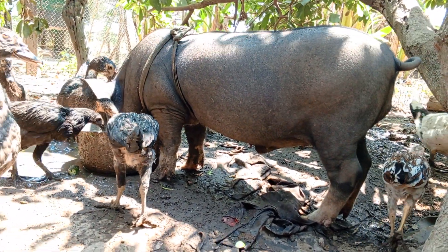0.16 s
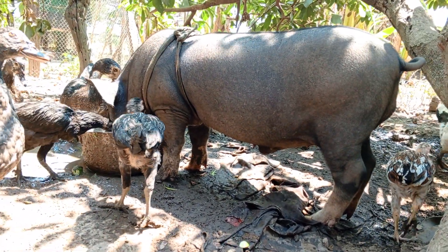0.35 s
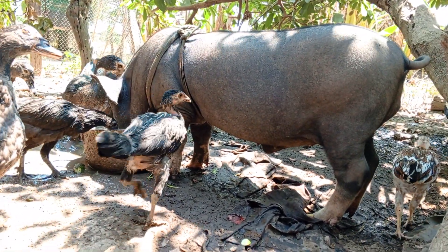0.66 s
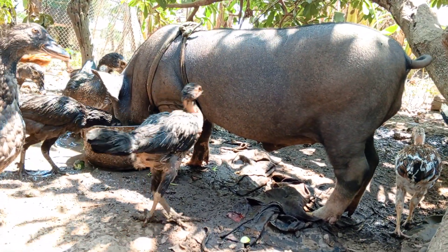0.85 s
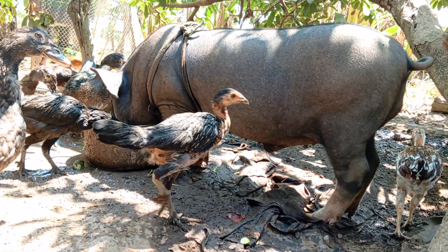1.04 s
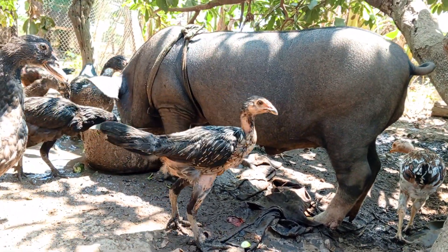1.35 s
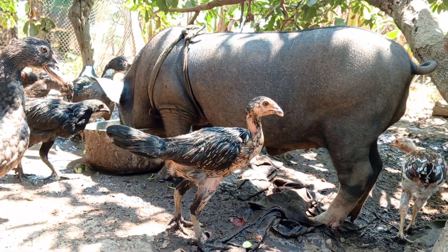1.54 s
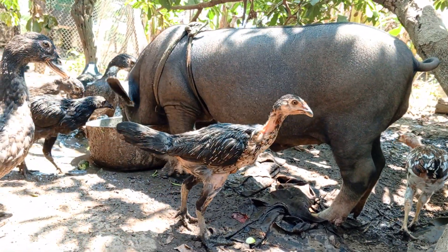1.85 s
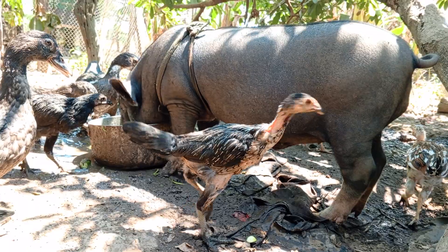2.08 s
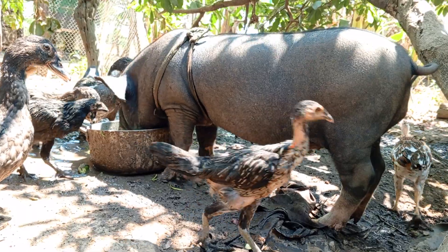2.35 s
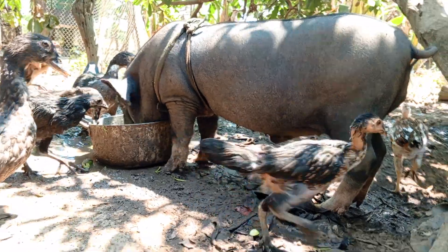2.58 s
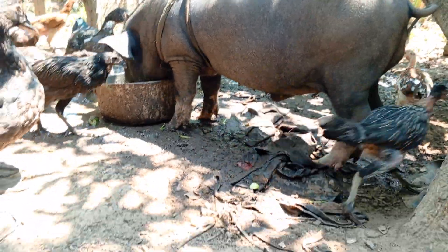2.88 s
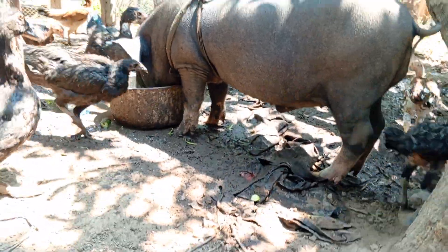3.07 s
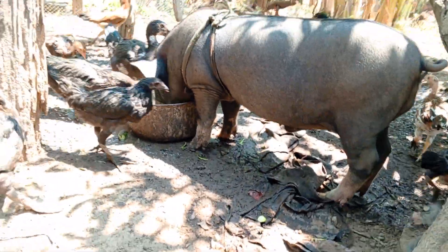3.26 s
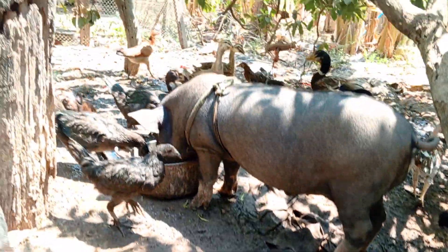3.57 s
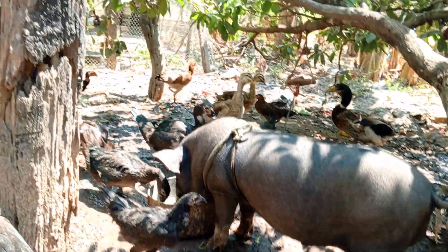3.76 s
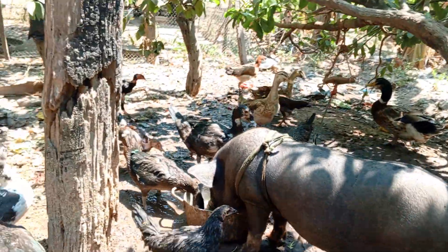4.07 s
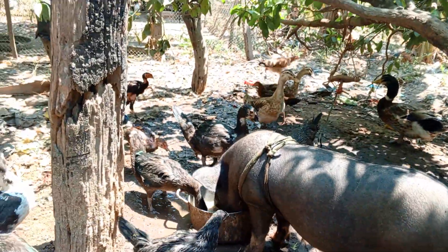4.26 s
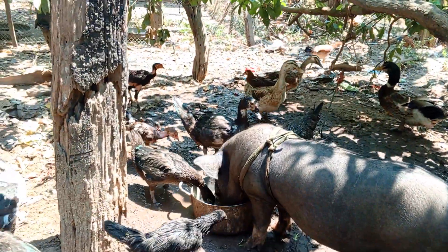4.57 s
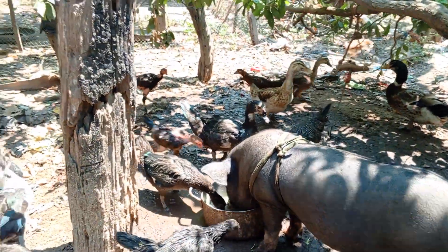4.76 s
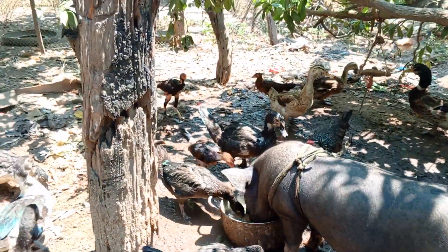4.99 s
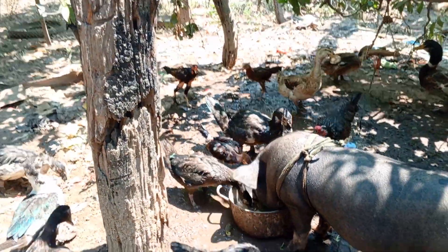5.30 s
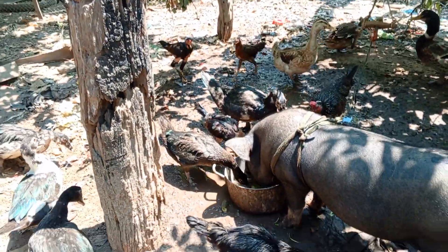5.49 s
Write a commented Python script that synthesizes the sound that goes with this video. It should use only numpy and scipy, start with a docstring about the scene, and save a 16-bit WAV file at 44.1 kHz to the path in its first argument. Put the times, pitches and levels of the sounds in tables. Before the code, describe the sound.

Close microphone among feeding poultry in an open yard with short scattered echoes. One long rasping quack comes early, then a light metallic bowl tick and a deep buffeting gust. Small clucks, high falling cheeps and dry beak knocks continue; two more quacks arrive late, the last shorter and mixed with a honk, before a flurry of pecking.

```python
"""Wind buffets the microphone and dies down, over a faint low hum and a patchy background bustle.
A close duck quacks three times: partials of a membrane, shaken by a second, plus air puffs through a moving bill.
Hens cluck (noise rings a narrow throat), chicks cheep and peep (near sines); a honk rises with the third quack.
Beaks peck (noise splashes), knock on a trough (a push of its wall) and tick a metal bowl (decaying modes).
Scattered echoes of the yard follow the birds and beaks; thin air hiss lies behind."""
import sys
import numpy as np
from scipy import signal
from scipy.fft import rfft, irfft
from scipy.io import wavfile
from scipy.ndimage import uniform_filter1d

SR = 44100
rng = np.random.default_rng(int(sys.argv[2]) if len(sys.argv) > 2 else 0)


def transcribe(signal):
    """Save signal, clipped to [-1, 1], as a 16-bit WAV file at the path in sys.argv[1]."""
    frames = np.atleast_2d(signal).T
    limited = np.clip(frames, -1, 1)
    pcm = np.round(limited * 32767).astype(np.int16)
    wavfile.write(sys.argv[1], SR, pcm)


N = 248283  # samples


def gain_of(db):
    """Logarithmic level: converts decibels to an amplitude factor."""
    return 10 ** (np.asarray(db) / 20)


def evened(x):
    """Energy normalisation: scales a signal to rms 1."""
    return x / np.sqrt(np.mean(x ** 2) + 1e-20)


def colour(x, points):
    """Spectral shaping: weights x by (hz, db) points joined on a log-frequency axis; rms 1."""
    point_hz, point_db = np.transpose(points)
    hz = np.fft.rfftfreq(len(x), 1 / SR)
    weight_db = np.interp(np.log(hz + 1), np.log(point_hz), point_db, left=-99)
    return evened(irfft(rfft(x) * gain_of(weight_db), len(x)))


def noise_of(size):
    """White noise: equal power at all frequencies."""
    return rng.standard_normal(size)


def add(mix, s, sound):
    """Superposition: sums a sound into the mix from s seconds on."""
    part = mix[max(round(s * SR), 0):][:len(sound)]
    part += sound[:len(part)]


def columns(rows, t):
    """Linear interpolation: reads each column of a curve table at times t."""
    s, *rest = np.transpose(rows)
    return [np.interp(t, s, c) for c in rest]


def drift(size, hz):
    """Random modulation: low-passed noise of rms 1, varying up to about hz."""
    smooth = signal.lfilter(*signal.butter(2, hz, fs=SR), noise_of(size + 2000))
    return evened(smooth[2000:])  # without the start of the filter's response


def ring(x, hz, width_hz):
    """Resonance: a fixed band-pass peak of given centre and bandwidth."""
    return signal.lfilter(*signal.iirpeak(hz, hz / width_hz, SR), x)


def resonate(x, hz, width_hz):
    """Moving resonance by heterodyning: shift the curve hz down to zero, smooth, shift back."""
    turn = np.exp(2j * np.pi * np.cumsum(hz) / SR)
    r = np.exp(-np.pi * width_hz / SR)
    return 2 * (turn * signal.lfilter([1 - r], [1, -r], x / turn)).real


def whistle(rows, waver):
    """Frequency modulation: a near sine along (start_s, pitch_hz, level_db), wavering in both."""
    t = np.arange(rows[0][0], rows[-1][0], 1 / SR)
    hz, db = columns(rows, t)
    turns = np.cumsum(hz * (1 + waver * drift(len(t), 170))) / SR
    flutter_db = 2.5 * drift(len(t), 60)
    return gain_of(db + flutter_db) * np.sin(2 * np.pi * turns) * signal.windows.tukey(len(t), .15)


def glide(s, length, start_hz, end_hz, db, waver):
    """Linear frequency sweep: one straight gliding note that swells and fades."""
    ends_db = -4  # level at start and end, relative to the middle
    rows = [(s + at * length, start_hz + at * (end_hz - start_hz), db + ends_db * (2 * at - 1) ** 2)
            for at in np.linspace(0, 1, 7)]
    return whistle(rows, waver)


def yard(x, t60, dull_hz):
    """Reverberation: scattered echoes from trunks, sheds and ground, decaying 60 dB in t60 seconds."""
    t = np.arange(0, .6, 1 / SR)
    tail = noise_of(len(t)) * gain_of(-60 * t / t60) * (t > .008)
    tail = signal.lfilter(*signal.butter(1, [700, dull_hz], "band", fs=SR), tail)
    return signal.fftconvolve(x, tail / np.linalg.norm(tail))[:N]


# strength of the low rumble before its lumps: start_s [s], level_db [dB]
RUMBLE_DB = [(0, -42.5), (.5, -46), (1.08, -39.5), (1.21, -36), (1.55, -41), (1.72, -37.5), (1.99, -45),
             (2.3, -42.5), (2.51, -47.5), (2.82, -66), (3.84, -67.5), (4.91, -56.5), (5.63, -70)]
# spectra of the rumble and of the roar: frequency_hz [Hz], density_db [dB per Hz]
RUMBLE_SPECTRUM = [(15, -51.5), (25, -22.5), (78, 4), (135, 4), (194, -6), (260, -18.5), (340, -35.5),
                   (570, -120)]
ROAR_SPECTRUM = [(100, -30.5), (170, 6), (199, 6.5), (562, -30.5), (618, -29), (700, -55.5), (910, -63.5),
                 (1540, -120)]
# eddies that thump the microphone: start_s [s], nominal level_db [dB], centre_hz [Hz]
EDDIES = [(0.059, -35, 134), (0.292, -29, 82), (0.513, -38.5, 111), (0.588, -31.5, 176), (1.143, -16, 71.5),
          (1.15, -8, 132), (1.21, -13.5, 169.4), (1.307, -19.5, 163), (1.361, -18.5, 151),
          (1.442, -21.5, 105), (1.682, -10.5, 196.2), (1.82, -19, 177), (1.889, -19, 192),
          (2.091, -38.5, 118.5), (2.393, -31.5, 140), (2.514, -35, 102.6), (2.601, -33, 110),
          (2.685, -39.5, 96.9), (3.101, -41.5, 72), (3.686, -39, 101.5)]
# roar level when the rumble is at gale level (dB); dB of roar per dB of rumble
ROAR_DB, GALE_DB, ROAR_GROWTH = -50, -39.5, 4.35


def wind():
    """Turbulence: lumpy rumble, a roar growing faster than it, and separate eddies a few cycles long."""
    rumble_db = columns(RUMBLE_DB, np.arange(N) / SR)[0]
    lumps = drift(N, 8.)
    out = gain_of(rumble_db + 3.3 * lumps) * colour(noise_of(N), RUMBLE_SPECTRUM)
    roar_db = ROAR_DB + ROAR_GROWTH * (rumble_db - GALE_DB) + 4 * lumps
    out += gain_of(roar_db) * colour(noise_of(N), ROAR_SPECTRUM)
    t = np.arange(0, .09, 1 / SR)
    envelope = (t / 0.038) * np.exp(-(t / 0.03) ** 2.01)
    for s, db, hz in EDDIES:
        eddy = np.sin(2 * np.pi * (hz * t + rng.random()))
        eddy += 0.55 * colour(noise_of(len(t)), ROAR_SPECTRUM)
        add(out, s - .008, gain_of(db - 4) * eddy * envelope)
    return signal.lfilter(*signal.butter(2, 65, "high", fs=SR), out)


# steady low tones: pitch_hz [Hz], level_db [dB, before a common lift]
HUM_TONES = [(86.1, -63), (123.8, -61), (209.9, -79.5)]


def hum():
    """Narrow-band tones: low sines whose level and phase waver at random."""
    t = np.arange(N) / SR
    out = np.zeros(N)
    for hz, db in HUM_TONES:
        level_db = db + 4 + 1.1 * drift(N, 14)
        out += gain_of(level_db) * np.sin(2 * np.pi * hz * t + 0.64 * drift(N, 31))
    return out


# level of the background bustle, with the tails of the quacks: start_s [s], level_db [dB]
BUSTLE_LEVEL = [(0, -61), (.2, -77.5), (.42, -65.5), (1, -53), (1.3, -66), (1.9, -59.5), (2.1, -77),
                (2.45, -66), (2.65, -75.5), (2.9, -67.5), (3.1, -80.5), (3.3, -72), (3.75, -73),
                (3.95, -86.5), (4.62, -48.5), (4.78, -67.5), (5.13, -50.5), (5.28, -64)]
# spectrum of the bustle: frequency_hz [Hz], density_db [dB per Hz]
BUSTLE_SPECTRUM = [(260, -31.5), (450, -17.5), (802, -13.5), (1100, -10), (1910, -3.5), (2080, -6),
                   (2260, -2), (4880, -11), (8000, -25.5), (10400, -52.5), (17600, -120)]


def bustle(patchy_db=5., flicker_db=2.5, calls_db=-9.):
    """Incoherent summation: patchy, flickering background noise; far birds add short blurred calls."""
    _, frame_s, z = signal.stft(noise_of(N), SR, nperseg=512)
    across_pitch = uniform_filter1d(noise_of(z.shape), 5, 0)
    unevenness = evened(uniform_filter1d(across_pitch, 16, 1))
    flicker = evened(uniform_filter1d(noise_of(len(frame_s)), 4))
    uneven_spectrum = z * gain_of(patchy_db * unevenness + flicker_db * flicker)
    patches = signal.istft(uneven_spectrum, SR, nperseg=512)[1][:N]
    calls = np.zeros(N)
    for at, long, high, bend in rng.random((170, 4)):
        start_hz, length = 1300 * 3 ** high, 0.018 + .06 * long
        end_hz = start_hz * (.85 + .2 * bend)
        add(calls, at * N / SR, whistle([(0, start_hz, 0), (length, end_hz, -4)], waver=.03))
    blurred = calls + yard(calls, 0.068, 10000)
    mixed = colour(evened(patches) + gain_of(calls_db) * evened(blurred), BUSTLE_SPECTRUM)
    return gain_of(columns(BUSTLE_LEVEL, np.arange(N) / SR)[0]) * mixed


# spectra of the steady hiss and of the thin top hiss: frequency_hz [Hz], density_db [dB per Hz]
AIR_SPECTRUM = [(3820, -29.5), (6500, -1.5), (8690, -19.5), (13400, -10.5), (15100, -11.5), (15800, -10.5)]
TOP_SPECTRUM = [(9000, -9.5), (13000, -6.5), (14500, 0.5), (15800, -0.5)]
# level of the top hiss before its flicker: start_s [s], level_db [dB]
TOP_LEVEL = [(0, -99), (4.1, -98.5), (4.6, -77), (5.5, -76), (5.54, -99)]


def hiss():
    """Shaped broadband noise: a faint wavering hiss, and a thin top hiss that flickers late on."""
    air = gain_of(-82 + 3 * drift(N, 6)) * colour(noise_of(N), AIR_SPECTRUM)
    top_db = columns(TOP_LEVEL, np.arange(N) / SR)[0] + 4 * drift(N, 25)
    return air + gain_of(top_db) * colour(noise_of(N), TOP_SPECTRUM)


# clucks of the hens: start_s [s], nominal level_db [dB], throat_hz [Hz], length_s [s]
HEN_CLUCKS = [(.004, -38.5, 665, 0.067), (.21, -61.5, 492, 0.033), (.276, -46.5, 486, 0.052),
              (.323, -36.5, 480, .015), (1.108, -39, 1717, 0.022), (1.162, -45, 1895, 0.047),
              (1.419, -50, 2104, 0.12), (1.425, -54, 1177, 0.046), (1.46, -51, 463, 0.055),
              (1.614, -39.5, 943, 0.034), (1.728, -38.5, 820, 0.031), (1.906, -47.5, 1900, 0.022),
              (2.114, -55, 610, 0.037), (2.298, -58, 1653, .032), (2.382, -48.5, 2048, 0.08),
              (2.405, -31.5, 749, 0.031), (2.544, -42, 473, 0.028), (2.743, -52, 540, 0.025),
              (2.839, -35.5, 740, 0.034), (3.164, -47.5, 470, 0.022), (3.331, -46.5, 721, 0.057),
              (3.431, -49.5, 1450, 0.0092), (3.452, -46, 1700, 0.0075), (3.504, -50, 1960, .015),
              (3.556, -49.5, 1055, 0.015), (3.583, -60, 607, 0.068), (3.63, -53, 1554, 0.034),
              (3.709, -54, 1520, 0.06), (4.048, -50.5, 693, 0.021), (4.085, -48.5, 685, 0.03),
              (4.594, -40.5, 1328, 0.072), (4.66, -34, 1590, 0.014), (5.243, -45.5, 804, 0.053),
              (5.266, -40.5, 1472, 0.078), (5.311, -27, 1595, 0.016), (5.377, -40.5, 1460, 0.06),
              (5.455, -59.5, 520, 0.042), (5.499, -48, 550, 0.04), (5.543, -32, 817, .019),
              (5.573, -37, 715, 0.027)]


def cluck(db, hz, length):
    """Source and filter: a short hoarse burst rings a narrow throat."""
    t = np.arange(0, 4 * length, 1 / SR)
    burst = ring(ring(noise_of(len(t)), hz, 100), hz, 240)
    envelope = np.minimum(t / 0.0056, 1) * np.exp(-(t / length) ** 2)
    return gain_of(db - 8) * evened(burst) * envelope


# cheeps: start_s [s], length_s [s], top_hz [Hz], bottom_hz [Hz], level_db [dB, before the contour]
CHICK_CHEEPS = [(0.116, 0.17, 4910, 2730, -68), (0.478, 0.33, 4640, 4300, -54.5),
                (1.262, 0.15, 4720, 2396, -56.5), (1.569, 0.18, 4890, 2683, -53),
                (1.911, 0.14, 5050, 3420, -62), (2.332, 0.15, 4910, 3460, -64),
                (2.657, 0.21, 5020, 2960, -65.5), (2.687, 0.077, 4650, 3340, -59.5),
                (3.038, 0.18, 5070, 3450, -67), (3.48, 0.12, 4840, 3580, -71),
                (3.922, 0.075, 4770, 3590, -59.5), (4.713, 0.13, 5220, 3240, -53.5),
                (5.155, 0.19, 5380, 3130, -57)]
# contour they share: time [share of length], pitch [share of the fall], level_db [dB]
CHEEP_CONTOUR = [(0, .35, -15), (0.121, 0.068, -12.5), (0.552, 0.11, -6), (0.679, 0.6, 3), (0.849, .8, -6),
                 (1.002, 1, 10)]


def cheep(s, length, top_hz, bottom_hz, db):
    """Pitch contour: one falling template is stretched in time and pitch to each call."""
    rows = [(s + at * length, top_hz + fall * (bottom_hz - top_hz), db + d) for at, fall, d in CHEEP_CONTOUR]
    return whistle(rows, waver=.016)


# peeps of other young birds: start_s [s], length_s [s], start_hz [Hz], end_hz [Hz], level_db [dB]
YOUNG_PEEPS = [(.4, 0.13, 2980, 2910, -55.5), (0.403, 0.12, 2280, 2550, -56),
               (0.478, 0.066, 1900, 2074, -53.5), (1.45, 0.032, 897, 890, -54.5),
               (1.582, 0.088, 2020, 2130, -53), (1.782, 0.04, 1000, 840, -54),
               (2.054, 0.15, 2016, 1994, -75), (2.8, 0.22, 2200, 2240, -89), (2.823, 0.19, 2770, 2756, -69),
               (3.06, 0.044, 2680, 2784, -73), (3.331, .23, 3070, 2787, -58),
               (3.355, 0.22, 2490, 2330, -74.5), (3.876, 0.12, 5580, 5540, -74),
               (5.138, 0.204, 2864, 2767, -55), (5.322, 0.046, 2770, 2620, -53),
               (5.17, 0.14, 2090, 2314, -62.5), (5.33, 0.054, 2140, 1870, -54.5)]


def peep(*row):
    """Near-sinusoidal source: a fairly level note with a slight waver."""
    return glide(*row, waver=.003)


# gesture of each quack: start_s [s], effort_db [dB], bill opening [0-1]
QUACK_GESTURES = [
    [(.55, -58, 0.1), (.59, -31.5, 0.06), (.625, -22, 0.4), (.67, -25, 0.69), (.84, -26, 0.79),
     (.88, -26.5, 1), (.915, -38.5, 1), (.96, -39.5, 1)],
    [(4.14, -62, 0.4), (4.17, -43, 0.17), (4.185, -24.5, 0.02), (4.255, -24.5, 0.23), (4.28, -26, 0.53),
     (4.46, -26, 0.6), (4.5, -30.5, 0.96), (4.525, -35, 0.76), (4.58, -69.5, 1)],
    [(4.83, -49.5, 0.4), (4.93, -46.5, 0.83), (4.97, -34, 0.66), (5.035, -31, 0.46), (5.07, -36, 0.03),
     (5.11, -71.5, 0.2)],
]
# one row a quack: pitch_hz at median effort [Hz], bill_shut_hz [Hz], bill_open_hz [Hz],
# roughness shut [0-1], second_membrane_hz [Hz], its climb_s [s], its level_db re effort [dB]
QUACK_VOICES = [(192.9, 2000, 2700, 0.54, 650, .21, -24.5), (193.1, 1400, 2060, 0.71, 610, 0.0914, -27),
                (185.5, 670, 1960, 0.69, 310, 0.19, -42)]
# partials of each quack, shaped by windpipe and bill: multiple of the pitch, level_db [dB]
QUACK_PARTIALS = [
    [(1, -12), (2, -33), (3, -29), (4, -32), (5, -12), (6, -17), (7, -17), (8, -9), (9, -12), (10, 0),
     (11, -15), (12, -3), (13, -12), (14, -19), (15, -11)],
    [(1, -10), (2, -25), (3, -32), (4, -33), (5, -8), (6, -13), (7, -8), (8, 0), (9, -12), (10, -2),
     (11, -12), (12, -9), (13, -10), (14, -18), (15, -13)],
    [(1, -17), (2, -43), (3, -24), (4, -22), (5, -8), (6, 0), (7, -2), (8, -1), (9, -10), (10, -7),
     (11, -17), (12, -15)],
]
# rasp of each quack: frequency_hz [Hz], density_db [dB per Hz]
QUACK_RASPS = [
    [(260, -85.5), (450, -62.5), (604, -21.5), (853, -25), (941, -14.5), (1250, -14), (1760, -5.5),
     (1920, -6), (2090, -13), (2280, -2), (3100, -21.5), (4600, -19), (8500, -41.5), (11000, -82.5),
     (18700, -120)],
    [(260, -44), (450, -27), (590, -33), (842, -19.5), (941, -6.5), (1050, -15), (1540, 2), (1700, -12.5),
     (1870, -3), (2040, -6), (3730, -10.5), (6410, -18), (8500, -30), (11000, -47), (18700, -120)],
    [(260, -102), (450, -69), (575, -12), (692, -24), (918, -3.5), (1390, 1), (2850, -25), (3300, -12),
     (4060, -17), (6250, -27.5), (8500, -41), (11000, -87), (18700, -120)],
]
# one breath level a quack, re effort and before the bill's shading: level_db [dB]
QUACK_BREATH_DB = [-44, -34, -32]
# top hiss of the duck's air: frequency_hz [Hz], density_db [dB per Hz]
BREATH_SPECTRUM = [(4710, -31), (8000, -16.5), (10500, -5.5), (13400, -7.5), (15100, -2.5), (15800, -7)]
SAG_HZ_PER_DB = 0.93  # pitch sinks with less effort
SHUT_DB, CLEARING = -22.5, 0.33  # treble behind the shut bill (dB); roughness lost as it opens
SECOND_START = .84  # the second membrane climbs from this share of its pitch


def quack(rows, call, partials, rasp, breath_db):
    """Coupled membranes: partials of one shaken by a second, plus air puffed once a cycle, through the bill."""
    t = np.arange(rows[0][0], rows[-1][0], 1 / SR)
    size = len(t)
    median_hz, shut_hz, open_hz, rough, second_hz, climb, second_db = call
    effort_db, opening = columns(rows, t)
    hz = median_hz + SAG_HZ_PER_DB * (effort_db - np.median(effort_db))
    bright_db = SHUT_DB * (1 - opening)
    bright_change_db = bright_db - np.median(bright_db)
    bill_hz = shut_hz + opening * (open_hz - shut_hz)
    rough = np.clip(rough - CLEARING * opening, 0, 1)
    second_hz = second_hz * np.interp(t - t[0], [0, climb], [SECOND_START, 1])
    turns, second_turns = np.cumsum(hz) / SR, np.cumsum(second_hz) / SR
    beat = np.sin(2 * np.pi * (second_turns - 3 * turns))
    tone, upper = np.zeros((2, size))
    for k in range(1, 37):
        # the beat puts sidebands on each partial
        shake = k * (.075 * beat + .017 * drift(size, 50))
        waver_db = min(.3 * k, 4) * drift(size, 10)
        partial = gain_of(waver_db) * np.cos(2 * np.pi * (k * turns + rng.random()) + shake)
        if k <= len(partials):
            tone += gain_of(partials[k - 1][1]) * partial
        else:
            upper += partial
    puffs = (0.58 + np.exp(-(turns % 1) / .25)) * noise_of(size)
    # the high partials share the colour of the rasp
    puffs = colour(evened(puffs) + .85 * evened(upper), rasp)
    treble = signal.sosfiltfilt(signal.butter(2, 2700, "high", fs=SR, output="sos"), puffs)
    treble += 2.5 * ring(puffs, 2500, 700) * np.clip(bright_change_db, 0, 6) / 6
    puffs += treble * (gain_of(bright_change_db) - 1)  # the open bill lets the treble out
    voice = np.sqrt(1 - rough) * evened(tone) + np.sqrt(rough) * puffs
    breath = gain_of(breath_db + .5 * bright_db + 3.5) * colour(noise_of(size), BREATH_SPECTRUM)
    voice += 0.61 * resonate(voice, bill_hz, 250) + breath
    voice += gain_of(second_db) * np.sin(2 * np.pi * second_turns)
    return gain_of(effort_db) * voice * signal.windows.tukey(size, .04)


BOWL_S = .975  # when the bowl is struck (s)
# modes of the bowl: pitch_hz [Hz], level_db [dB], t60_s [s]
BOWL_MODES = [(986, -48, .9), (1997, -40, .6), (4600, -58, .15)]


def bowl():
    """Modal vibration: a beak ticks the metal bowl, which rings until a touch stills it."""
    t = np.arange(0, .19, 1 / SR)
    modes = sum(gain_of(db - 60 * t / t60) * np.sin(2 * np.pi * hz * t) for hz, db, t60 in BOWL_MODES)
    tick = gain_of(-42 - 60 * t / .05) * evened(ring(noise_of(len(t)), 1300, 1200))
    return modes * signal.windows.tukey(len(t), .05) + tick


# pecks, smacks and scratches: start_s [s], nominal level_db [dB], length_s [s]
BEAK_PECKS = [(1.168, -36, 0.0048), (1.512, -46, 0.037), (1.89, -48, 0.0041), (1.923, -47, 0.016),
              (2.4216, -38, 0.021), (2.451, -30.5, 0.0033), (2.743, -42.5, 0.011), (2.974, -43, 0.018),
              (3.303, -40, 0.0079), (3.446, -50, 0.008), (3.716, -45, 0.0065), (4.0264, -57, 0.0048),
              (4.045, -47, 0.026), (4.13, -52.5, 0.0045), (4.666, -35, 0.0041), (4.763, -40, 0.012),
              (5.216, -40.5, 0.019), (5.278, -34, 0.02), (5.2994, -30, 0.022), (5.37, -36, 0.0054),
              (5.394, -39.5, 0.034), (5.4776, -37, 0.019), (5.507, -27, 0.0081)]
# spectrum of a peck, also of the tick in a knock: frequency_hz [Hz], density_db [dB per Hz]
PECK_SPECTRUM = [(710, -25.5), (1200, -2.5), (2320, -10.5), (3450, -7.5), (4620, -7.5), (6960, -11.5),
                 (8920, -30.5), (11600, -22.5), (15800, -34.5)]


def peck(db, length):
    """Impulsive noise: a wide, short splash under a bell-shaped envelope."""
    t = np.arange(0, .06, 1 / SR)
    splash = colour(noise_of(len(t)), PECK_SPECTRUM)
    envelope = signal.windows.tukey(len(t), .3) * np.exp(-((t - .008) / length) ** 2)
    return gain_of(db - 18.5) * splash * envelope


# beaks knocking on the trough: start_s [s], level_db of the push [dB], body_hz [Hz],
# treble_db re the push, before a common lift [dB]
TROUGH_KNOCKS = [(1.238, -30, 533, -63), (1.638, -49.5, 900, -10), (2.619, -34.5, 508, -42),
                 (3.807, -33, 484, -41), (4.817, -26.5, 364, -37)]


def knock(db, hz, treble_db):
    """Impact response: one push of the wall, a dull rattle after it and a tick on top."""
    t = np.arange(0, .12, 1 / SR)
    push = np.sin(2 * np.pi * hz * t) * np.exp(-t / 0.004)
    rattle = evened(ring(noise_of(len(t)), 1.73 * hz, 340)) * np.exp(-t / 0.026)
    tick = colour(noise_of(len(t)), PECK_SPECTRUM)
    tick *= np.exp(-t / 0.0026) + 0.46 * np.exp(-t / 0.021)
    return gain_of(db) * (push + 0.11 * rattle + gain_of(treble_db + 10) * tick)


# rising strands of a honk as the third quack begins:
# start_s [s], length_s [s], start_hz [Hz], end_hz [Hz], level_db [dB]
HONK_STRANDS = [(4.834, 0.087, 1265, 1336, -38), (4.842, 0.11, 1414, 1597, -34.5),
                (4.908, 0.1064, 971, 1150, -36), (4.9, 0.17, 3100, 3310, -42.5)]


def honk_strand(*row):
    """Additive synthesis: one rising, wavering strand; overlapping strands make the honk."""
    return glide(*row, waver=.005)


def scene():
    """Superposition of sources: birds and beaks with their echoes, over wind, hum, bustle and hiss."""
    duck, chicks, near = np.zeros((3, N))
    for s, *row in HEN_CLUCKS:
        add(near, s - .003, cluck(*row))
    for row in CHICK_CHEEPS:
        add(chicks, row[0], cheep(*row))
    for row in YOUNG_PEEPS:
        add(chicks, row[0], peep(*row))
    for rows, *voice in zip(QUACK_GESTURES, QUACK_VOICES, QUACK_PARTIALS, QUACK_RASPS, QUACK_BREATH_DB):
        add(duck, rows[0][0], quack(rows, *voice))
    add(near, BOWL_S, bowl())
    for s, *row in BEAK_PECKS:
        add(near, s - .003, peck(*row))
    for s, *row in TROUGH_KNOCKS:
        add(near, s, knock(*row))
    for row in HONK_STRANDS:
        add(duck, row[0], honk_strand(*row))
    echoes = yard(gain_of(-12.0) * duck + gain_of(-19.0) * near, 0.32, 8600)
    echoes += gain_of(-6) * yard(chicks, .22, 7000)
    background = wind() + hum() + bustle() + hiss()
    return (duck + chicks + near + echoes + background)[None]


def record(dry):
    """Band limitation: a steep linear-phase low-pass at 15870 Hz."""
    low_pass = signal.firwin(1023, 15870, window=("kaiser", 9), fs=SR)
    return signal.oaconvolve(dry, low_pass[None], "same")


dry = scene()
out = record(dry)
transcribe(out)
```